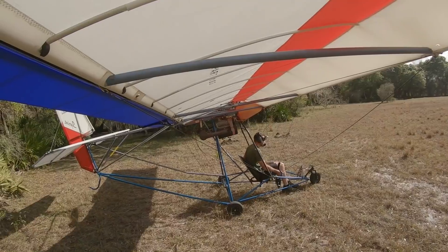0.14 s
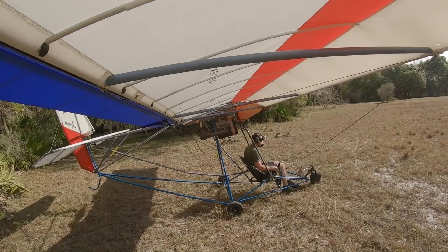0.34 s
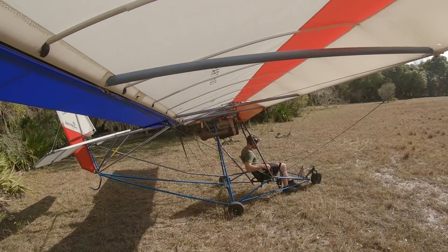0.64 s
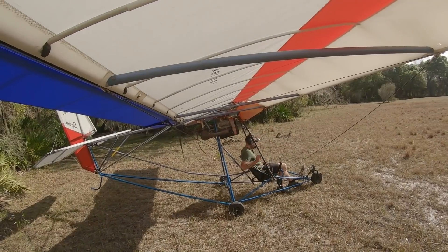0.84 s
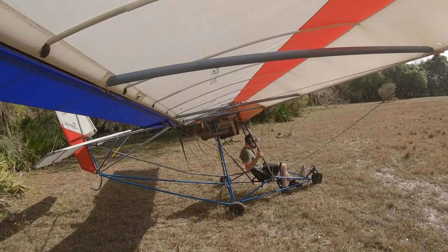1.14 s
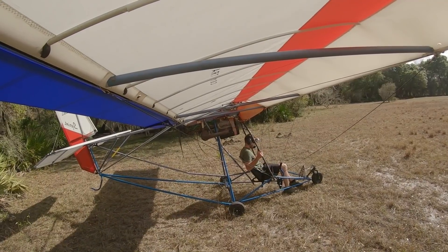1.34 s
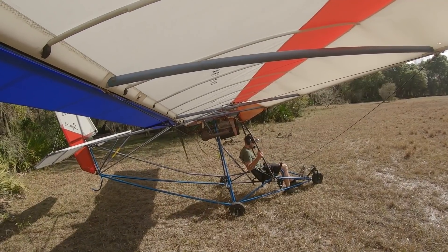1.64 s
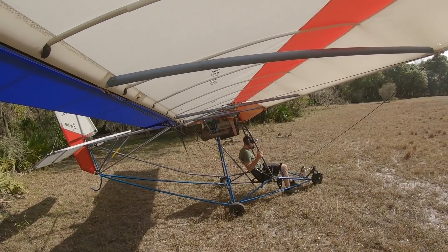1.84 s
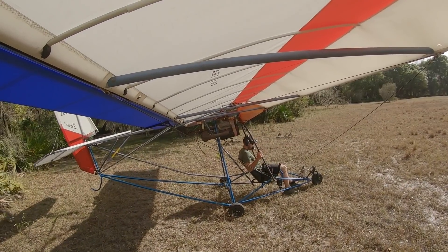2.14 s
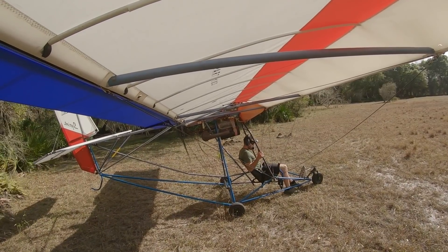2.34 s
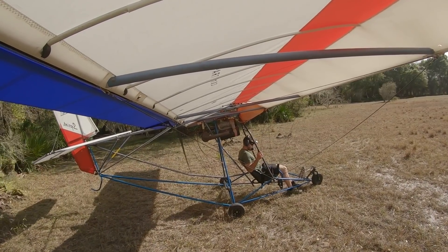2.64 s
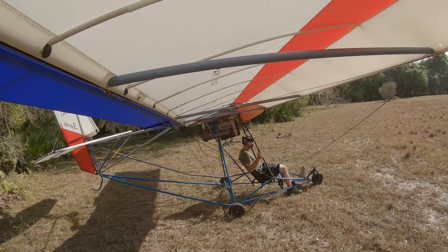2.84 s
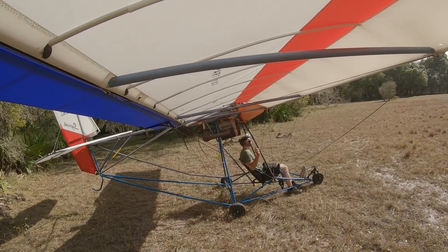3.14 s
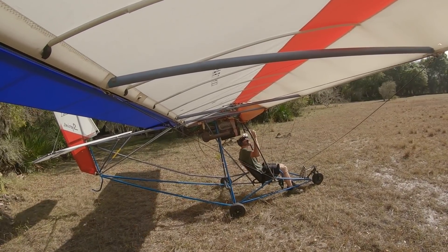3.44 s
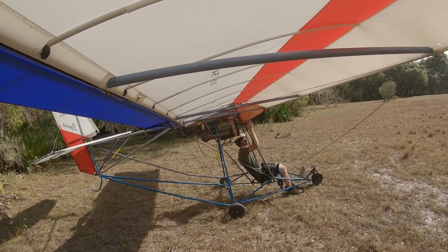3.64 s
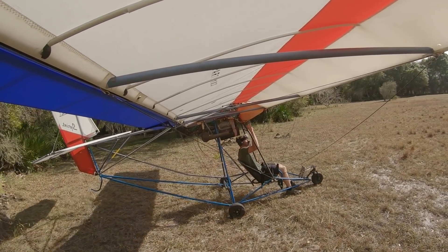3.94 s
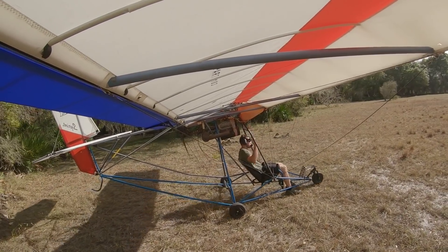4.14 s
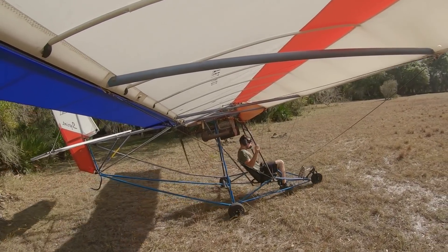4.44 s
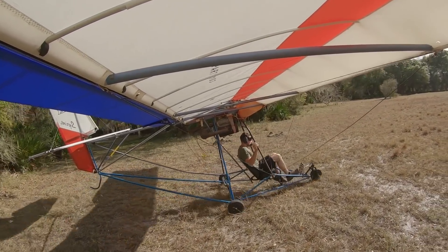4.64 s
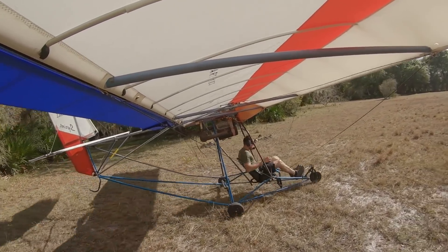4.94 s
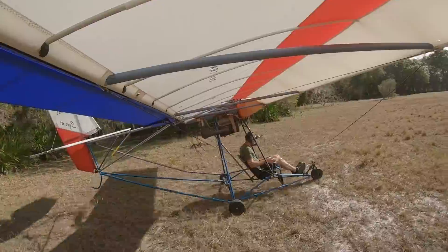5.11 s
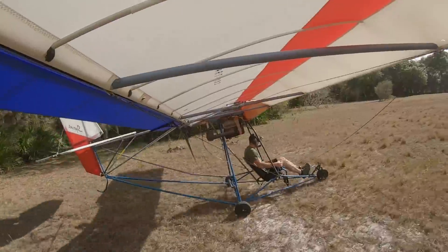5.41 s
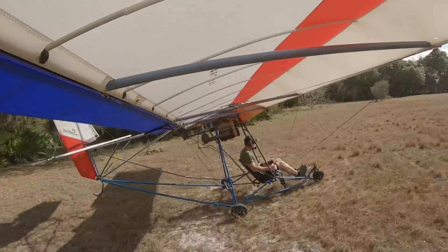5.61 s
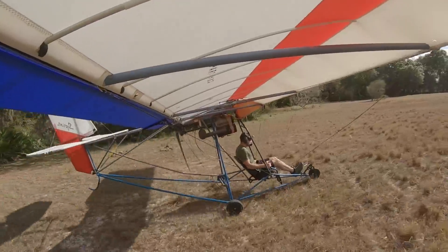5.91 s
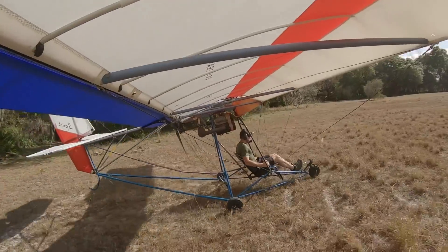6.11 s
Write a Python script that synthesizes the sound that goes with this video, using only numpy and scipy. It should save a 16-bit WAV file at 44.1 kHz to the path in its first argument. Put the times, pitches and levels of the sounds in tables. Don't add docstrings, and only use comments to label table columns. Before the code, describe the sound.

From 0 to 0.66 s there is only very quiet airy noise, thin hiss, a fine 60-per-second electrical buzz and faint low rumble. At about 0.67 s a small two-stroke idles in, uneven, with hollow pops and rattling clumps. From 1.5 s it runs up: exhaust rasp, propeller buzz and belt whine climb quickly, slowing near 2.7 s, with brief airframe resonances. At 2.8 s it jumps louder and holds part throttle, pitch creeping upward, whine prominent. Around 4.0-4.2 s it dips in level, then surges, pitch leaping about a quarter higher and loudest near 4.5 s. Hard uneven blade slaps, a mid-pitched strut hum until 5.5 s, and small overload ticks and thumps at 4.7-5.2 s accompany it as it eases into a steady full-power drone until 6.27 s. Close, dry, dull outdoor sound, nearly centred, slightly earlier on the right.

```python
import sys
import numpy as np
from scipy import signal
from scipy.fft import rfft, irfft, next_fast_len
from scipy.io import wavfile
from scipy.ndimage import uniform_filter1d, map_coordinates

SR = 44100
rng = np.random.default_rng(int(sys.argv[2]) if len(sys.argv) > 2 else 0)


def natural_amplitude(level_db):
    exponent = np.asarray(level_db, float) / 20
    return 10 ** exponent


def unload_wav(signal):
    wavfile.write(
        sys.argv[1],
        SR,
        np.round(np.clip(np.atleast_2d(signal).T, -1, 1) * 32767).astype(np.int16),
    )


N = 276507

# (time [s], crank turns [Hz], blade passes [Hz])
SHAFT_SPEEDS = [(1.4, 41.2, 30.75), (1.5, 43.01, 32.1), (1.6, 46.45, 34.71), (1.8, 55.32, 41.34),
                (2.0, 62.3, 46.42), (2.2, 67.75, 50.34), (2.45, 72.6, 53.95), (2.75, 76.0, 56.47),
                (3.1, 78.8, 58.55), (3.6, 80.7, 59.96), (4.15, 82.15, 60.98), (4.25, 84.4, 62.35),
                (4.5, 97.5, 71.6), (4.6, 101.67, 74.25), (4.7, 104.0, 75.52), (4.8, 105.73, 76.68),
                (5.1, 107.06, 77.66), (5.8, 107.93, 78.52)]
# (time [s], level [dB])
LOUDNESS = [(0, -48), (.662, -59.5), (.68, -45.5), (1.06, -41), (1.43, -42.5), (1.61, -30.5), (1.94, -25.5),
            (2.2, -23.5), (2.77, -21.5), (2.88, -15), (3.6, -15.5), (3.96, -16.5), (4.17, -20.5),
            (4.33, -13.5), (4.52, -7.5), (4.74, -11), (4.88, -13), (5.2, -14.5), (5.5, -16), (6.22, -16.5),
            (6.27, -16.5)]
# (time [s], stage [number])
THROTTLE_STAGE = [(0, 0.27), (.66, 0.54), (.672, 1.32), (1.45, 1.11), (1.6, 2.04), (2.1, 2.28), (2.6, 3.17),
                  (2.82, 3.02), (3.2, 3.015), (3.8, 3), (4.2, 3.24), (4.3, 3.68), (4.45, 4), (4.72, 4.6),
                  (4.87, 4.75), (5.35, 4.89), (5.52, 5.52), (6.27, 4.96)]
# (stage [number], level [dB])
TONE_SHARE = [(.5, -20), (1, -24), (1.5, -4), (2, -4.5), (3, 2.4), (4, -4.5), (5, 1.5)]
# (stage [number], level [dB])
RUSH_SHARE = [(2.4, -2), (3, -2), (3.5, -5), (3.999, -9.5), (4.501, -7.5), (4.798, -12.5), (5, -9)]
TONE_STAGES = [
    2.1,
    2.6,
    3,
    3.12,
    3.5,
    4,
    4.55,
    4.8,
    5,
]
# (crank multiple [number], level at each of the nine stages [dB])
EXHAUST_TONES = [(2, -5.5, -30.5, -36.5, -35, -20, -3.5, -8.0, -6.5, -4.5),
                 (3, -24, -50, -40, -41, -36, -31, -30, -50, -49),
                 (4, -9.5, -29, -21.5, -23, -30, -5.5, -14.5, -14, -15.0),
                 (5, -32, -25, -25.0, -24.5, -29.5, -26.5, -18.0, -16.5, -27),
                 (6, -30, -24.5, -23.5, -37.5, -32, -18, -7.5, -13, -13.5),
                 (7, -37, -31, -30, -39, -48, -38, -30.5, -20, -25.5),
                 (8, -17.5, -9, -17.5, -26, -26.5, -15, -11, -18, -20.5),
                 (9, -26, -18, -21.5, -32, -26.5, -29, -24, -40.5, -36),
                 (10, -13, -18, -19.5, -22.5, -14, -10, -17.5, -12.0, -11.5),
                 (11, -32, -24, -28.5, -21, -20, -17, -18.5, -30.5, -27.5),
                 (12, -17, -17, -21, -28, -19, -18, -25, -21.5, -27.0),
                 (13, -35, -26, -18, -36.5, -10.5, -15.5, -34.5, -39, -43.5),
                 (14, -21.5, -14.5, -18, -26.5, -22.0, -33.5, -34, -19, -20.5),
                 (15, -27, -24.5, -17, -29, -32.5, -34.5, -30, -43.5, -47),
                 (16, -20.5, -11.5, -16, -27.5, -18, -19, -30, -34.5, -26),
                 (17, -33, -27, -23, -33.5, -30, -21.5, -27, -26.5, -29.5),
                (18, -8, -11.5, -25.5, -32.5, -27.5, -19, -24.5, -35.5, -43),
                (19, -24, -35, -31.5, -29, -37.5, -31, -26, -29, -42.5),
                (20, -4.5, -13.5, -16.5, -7, -15, -32, -22.5, -24, -29),
                (21, -27, -25, -24.5, -31, -39, -31, -16.5, -25.5, -21.5),
                (22, -10.5, -14, -22.5, -23, -46.5, -25, -41, -39, -44),
                (23, -34, -28, -24.5, -28.5, -47.5, -30, -41, -36, -50.5),
                (24, -20, -14.5, -29, -30.5, -30.5, -29.5, -41.5, -41, -32.5),
                (25, -31.5, -26.5, -22, -17.5, -42, -48, -42.5, -38.5, -37),
                (26, -18, -17, -28.5, -24.5, -34, -41.5, -36.5, -24, -27),
                (27, -36, -28, -20, -8.5, -48, -33, -42.5, -39.5, -30),
                (28, -13, -19, -19.5, -45, -43, -36, -36.5, -31.5, -36),
                (29, -33.5, -31, -27.5, -30, -40.5, -39.5, -40.5, -44.5, -50.5),
                (30, -16, -21.0, -29, -30.5, -39, -35.5, -44, -44.5, -45.5),
                (31, -31, -28, -33.5, -33, -35.5, -45, -56.5, -54.5, -55),
                (32, -14, -10, -36.5, -35.5, -47.5, -33.5, -45.5, -50, -34),
                (33, -27, -19.5, -34, -24.5, -43, -42.5, -46, -60.5, -61),
                (34, -18, -28.0, -36.5, -35, -25, -37, -55.5, -60, -59)]
# (blade-pass multiple [number], level at each of the nine stages [dB])
BLADE_TONES = [(3, -48, -45, -38, -36, -18.5, -17, -16, -18.0, -17.5),
               (4, -31, -51, -40.5, -46.5, -32.5, -25, -23, -26, -32.5),
               (5, -23, -45, -33, -32, -37, -32.5, -25.5, -26.5, -27),
               (6, -49, -40, -24.5, -27.0, -27, -14.5, -19, -13, -12.5),
               (7, -44, -16.5, -22, -18.5, -28, -10, -15.5, -13.5, -14.5),
               (8, -14, -21.5, -27.5, -22, -21, -30, -20.5, -17.5, -19.5),
               (9, -23, -15.5, -31, -24.5, -25.5, -30, -10.5, -13.5, -12),
               (10, -36, -18, -32, -13, -18.5, -21.5, -13.5, -16.5, -22.5),
               (11, -21.5, -18.5, -21.5, -28, -22, -12, -28.5, -16, -22.5),
               (12, -36, -26, -24.5, -31, -26, -28, -16.5, -19.5, -30),
               (13, -35, -27.5, -25, -27.5, -33, -31, -33.5, -19, -34.5),
               (14, -19, -21, -25, -30, -33.5, -28.5, -33, -29, -30),
               (15, -25, -16, -25, -27.5, -22.5, -13, -18, -40.5, -29),
               (16, -35, -25.5, -22, -30, -31.5, -32.5, -33, -40.5, -33.5),
               (17, -38, -24.5, -27, -36, -27, -26, -33, -42, -44),
               (18, -34, -18, -20, -29, -37, -38.0, -31, -32, -46),
               (19, -33, -22, -23, -28, -24, -35, -33.5, -34, -26.5),
               (20, -35, -29, -34, -34.5, -40, -34.5, -32, -35.5, -38),
               (21, -31, -34, -19.5, -32.5, -43, -41, -47.5, -42, -40.5),
               (22, -27, -25, -34.5, -29.5, -40, -25.5, -24.5, -35.5, -21.5)]
UNEVEN_BLADES = [(4, 0), (4.5, .8), (4.7, .6), (4.82, .35), (5, .15)]
# (frequency [Hz], level against the whole [dB])
BELT_WHINE = [(800, -20), (1150, -15), (1300, -7), (1385, -2), (1456, -2), (1468, -9), (1830, -12.5),
              (1890, -29)]
# (frequency [Hz], width [Hz], boost [dB])
FRAME_RESONANCES = [(400, 48, 2), (540, 68, 1), (686, 40, 2), (930, 42, 5.5), (1100, 37, 4.5),
                    (1580, 90, 6), (1810, 70, 2.5)]
RESONANCE_SHARE = [(2.8, 1), (2.98, 0), (3.14, 0), (3.4, 1), (4.3, 1), (4.55, 0)]
THROTTLE_GULP = [(3.12, 0), (3.25, .45), (3.7, .45), (3.95, 0.01)]
# (frequency [Hz], width [Hz], level [dB])
MUFFLER = [(161, 20, 9.5), (536, 69, 0), (740, 59, -15), (1166, 55, 15), (1860, 24, 0), (2350, 330, -27)]
# (time [s], peak [dB], ringing [Hz])
IDLE_POPS = [(0.678, -54, 700), (0.775, -50, 660), (0.809, -49, 740), (0.917, -49, 770), (0.994, -43, 930),
             (1.009, -59, 880), (1.05, -46, 487), (1.098, -51, 540), (1.238, -52, 520), (1.309, -53, 494),
             (.679, -50, 1113), (.71, -50, 2060), (.735, -47, 1410), (.856, -55, 1190), (0.916, -46, 1050),
             (0.947, -44, 1280), (.988, -44, 1166), (1.012, -42, 1700), (1.046, -41.5, 1720),
             (1.073, -46, 1740), (1.005, -60, 170), (1.045, -52, 170), (1.106, -52, 169), (1.21, -59, 165),
             (1.25, -55, 165), (1.31, -56, 180), (1.39, -59, 170)]
# (frequency [Hz], level [dB per Hz])
AIR_COLOUR = [(60, -6), (130, 4), (200, 6), (300, 8), (450, 0.5), (700, 1), (1000, 2.5), (1400, -2),
              (1800, -18), (2200, -6), (2500, -12), (3000, -20), (3350, -21)]
# (frequency [Hz], level [dB per Hz])
IDLE_COLOUR = [(60, -24), (130, -15), (200, 0), (300, -4), (450, -8.5), (700, -6.5), (1000, -18),
               (1400, -0.5), (1800, -1), (2200, -7), (2500, -6.5), (3000, -6.5), (3350, -6.5)]
# (frequency [Hz], level [dB per Hz])
RUNUP_COLOUR = [(60, -30), (130, -22), (200, -18.5), (300, -18), (450, -8), (700, -9.5), (1000, 8.5),
                (1400, -3.5), (1800, -2), (2200, 0), (2500, -14.5), (3000, -21), (3350, -9.5)]
# (frequency [Hz], level [dB per Hz])
PART_COLOUR = [(60, -29), (130, -28), (200, -24), (300, -29), (450, -19), (700, -11.5), (1000, -14.5),
               (1400, -4), (1800, -6.5), (2200, -6), (2500, -8), (3000, -7), (3350, -18.5)]
# (frequency [Hz], level [dB per Hz])
SURGE_COLOUR = [(60, -36.5), (130, -43.5), (200, -21), (300, -32.5), (450, -16), (700, -11), (1000, -5),
                (1400, -8), (1800, -15), (2200, -5.5), (2500, -28), (3000, -9), (3350, -14.5)]
# (frequency [Hz], level [dB per Hz])
FULL_COLOUR = [(60, -20), (130, -29), (200, -14.5), (300, -31.5), (450, -8), (700, -24), (1000, -13),
               (1400, -18.5), (1800, -20), (2200, -18.5), (2500, -23.5), (3000, -21.5), (3350, -22.5)]
# (time [s], level [dB])
STRUT_LEVEL = [
    (4.5, -120),
    (4.58, -45),
    (4.68, -28),
    (5.16, -26),
    (5.3, -30),
    (5.44, -35),
    (5.52, -50),
    (5.6, -120),
]
# (frequency [Hz], likeness [0-1])
LIKENESS = [(100, 1), (500, 1), (2000, .95), (3300, .95)]
# (frequency [Hz], level [dB per Hz])
HISS_COLOUR = [(3000, -7), (4000, -2.5), (8000, -2), (12000, -2), (13000, -10), (15500, -16.5)]
# (frequency [Hz], level [dB per Hz])
BUZZ_COLOUR = [(3000, -27), (10000, -27), (12200, -24), (13100, -11), (13900, -28), (14500, -13),
               (14900, -1.5), (15400, -5)]
# (engine level [dB], low band [dB], middle band [dB])
FLOOR_DUCKING = [(-50, -70.5, -73), (-20.5, -69.5, -73), (-14, -76.5, -74.5), (-16, -81.5, -74.5)]
# (engine level [dB], extra level [dB])
LOWEST_BAND_HOLE = [(-42, 0), (-28, -30)]
# (time [s], length [s])
TREBLE_GAPS = [
    (2.936, 0.04),
    (3.041, .925),
    (4.574, 0.023),
    (4.768, .055),
    (4.833, 0.23),
    (5.097, .095),
    (5.22, .07),
]
# (time [s], tick [dB], thump [dB], splatter [dB])
OVERLOADS = [
    (4.7103, -52, -64, -92.5),
    (4.7876, -49.5, -50, -63.5),
    (4.9203, -51.5, -42.5, -89),
    (4.952, -54, -49, -68),
    (5.0187, -57.5, -50, -84),
    (5.1054, -59, -51, -67.5),
    (5.1498, -50.5, -51.5, -96.5),
    (5.173, -52.5, -50, -68),
]

FRAME_RATE_HZ, FIRST_FRAME_S = 59.94, .00388
CAMERA_TOP_HZ = 3420
STRUT_HZ = 453.4
HARD_SLAP_S = 4.8125
SPLATTER_S = 0.029


def unit(x):
    return x / np.sqrt(np.mean(x ** 2) + 1e-20)


def along(points, hz):
    f, v = np.transpose(points)
    return np.interp(np.log(hz + 1), np.log(f + 1), v)


def by_value(x, table):
    return np.interp(x, *np.transpose(table))


def curves(rows):
    s, *columns = np.transpose(rows)
    t = np.arange(N) / SR
    return [np.interp(t, s, column) for column in columns]


def knots(rate):
    places = np.arange(N // 32 + 2) * 32 * min(rate, 100) / SR
    return map_coordinates(rng.standard_normal(700), [places])


def fine(coarse):
    return np.interp(np.arange(N) / 32, np.arange(len(coarse)), coarse)


def wobble(rate):
    return fine(knots(rate))


def filtered(x, response):
    m = next_fast_len(N + 8192)
    return irfft(rfft(x, m) * response(np.fft.rfftfreq(m, 1 / SR)), m)[..., :N]


def highpass(hz, corner_hz, power):
    return hz ** power / (hz ** power + corner_hz ** power)


def resonance(hz, centre_hz, width_hz):
    return 1 / (1 + (2 * (hz - centre_hz) / width_hz) ** 2)


def noise(spectrum, patchy_db):
    z = signal.stft(rng.standard_normal(N), nperseg=1024)[2]
    patches = uniform_filter1d(rng.standard_normal(z.shape), size=6, axis=0)
    patches = uniform_filter1d(patches, size=4, axis=1)
    raw = signal.istft(z * natural_amplitude(patchy_db * unit(patches)), nperseg=1024)[1][:N]
    return unit(filtered(raw, lambda hz: natural_amplitude(along(spectrum, hz)) * (hz < 1.2 * spectrum[-1][0])))


def preamp_hiss():
    shared = noise(HISS_COLOUR, patchy_db=4.0)
    opposite = noise(HISS_COLOUR, patchy_db=1.0) * [[1], [-1]]
    return natural_amplitude(-5.0) * (shared + 0.62 * opposite)


def frame_buzz():
    at = np.arange(FIRST_FRAME_S, N / SR, 1 / FRAME_RATE_HZ)
    spikes = np.zeros(N)
    spikes[np.round(at * SR).astype(int)] = natural_amplitude(1.2 * rng.standard_normal(len(at)))
    smear = np.hanning(70) * (1 + .8 * rng.standard_normal(70))

    def colour(hz):
        return natural_amplitude(along(BUZZ_COLOUR, hz)) * (hz > 2500)

    sharp = unit(filtered(spikes, colour))
    smeared = unit(filtered(np.convolve(spikes, smear, "same"), colour))
    return unit(sharp + 0.55 * smeared) + natural_amplitude(-7.0) * noise(BUZZ_COLOUR, patchy_db=2.5)


def camera_floor():
    floor = preamp_hiss() + frame_buzz()
    edges_hz = (3300, 5000, 7000, 12800, 15400)
    bands = [unit(filtered(floor, lambda hz: (hz > lo) & (hz <= hi)))
             for lo, hi in zip(edges_hz, edges_hz[1:])]
    t = np.arange(N) / SR
    muted = sum((t > s) & (t < s + length) for s, length in TREBLE_GAPS)
    engine_db = curves(LOUDNESS)[0]
    table_db, *ducked = np.transpose(FLOOR_DUCKING)
    low_db, middle_db = (np.interp(engine_db, table_db, db) for db in ducked)
    low_db = low_db - 6.0 - 25.5 * muted
    lowest_db = low_db + by_value(engine_db, LOWEST_BAND_HOLE)
    top_db = -69.5 - 47 * muted
    levels_db = lowest_db, low_db, middle_db, top_db
    return sum(natural_amplitude(db + 2.0) * band for db, band in zip(levels_db, bands))


def overloads():
    t = np.arange(N) / SR
    ticks, thumps, splatter = np.zeros((3, N))
    for s, tick_db, thump_db, splatter_db in OVERLOADS:
        splatter += natural_amplitude(splatter_db) * np.exp(-(2 * (t - s) / SPLATTER_S) ** 2)
        ticks[round(s * SR)] = natural_amplitude(tick_db + 17)
        thumps[round(s * SR)] = natural_amplitude(thump_db + 46)

    def tick_colour(hz):
        tilt = 1.4 / (1 + (hz / 12500) ** 10) + .5 / (1 + (hz / 4800) ** 6)
        return (hz > 3600) * tilt * np.exp(-.5j * (hz / 4000) ** 2)

    ticks = np.convolve(ticks, np.hanning(90) * rng.standard_normal(90) / 5, "same")
    ticks = filtered(ticks, tick_colour)
    spray = filtered(rng.standard_normal(N), lambda hz: (hz > 3750) / (1 + (hz / 4700) ** 12))
    thumps = filtered(thumps, lambda hz: 1j * hz * 40 / (40 ** 2 - hz ** 2 + 1j * hz * 40))
    return ticks + splatter * unit(spray) + thumps


def rumble():
    colour = [(15, -5.0), (40, 0.5), (100, -1.0), (200, -14)]  # (frequency [Hz], level [dB per Hz])
    opposite = noise(colour, patchy_db=-1) * [[1], [-1]]
    return natural_amplitude(-60.0) * (noise(colour, patchy_db=-2.5) + .2 * opposite)


def camera():
    return camera_floor() + rumble() + overloads()


def strut_hum(blade):
    level_db = curves(STRUT_LEVEL)[0] + wobble(12)
    hum = 2 * np.pi * STRUT_HZ * np.arange(N) / SR
    sidebands = [(-1, -10), (0, 0), (1, -6), (2, -9), (3, -10)]  # (turn-rate step [number], level [dB])
    shaken = sum(natural_amplitude(db) * np.cos(hum + k * np.pi * blade) for k, db in sidebands)
    return np.sqrt(2) * natural_amplitude(level_db) * shaken


def idle_pops():
    out = np.zeros(N)
    t = np.arange(SR // 10) / SR
    for s, db, hz in IDLE_POPS:
        decay = natural_amplitude(db + 10.5 - 60 * t / 0.072)
        attack = 1 - np.exp(-t / 0.0027)
        out[round(s * SR):][:len(t)] += decay * attack * np.sin(2 * np.pi * hz * t)
    return out


def gas_and_air_rush(stage, gain):
    colours = (IDLE_COLOUR, RUNUP_COLOUR, PART_COLOUR, SURGE_COLOUR, FULL_COLOUR)
    layers = [noise(AIR_COLOUR, patchy_db=.7)]
    layers += [noise(colour, patchy_db=3.0) for colour in colours]
    idle = filtered(layers[1], lambda hz: 1 + sum(natural_amplitude(db) * resonance(hz, c, w) for c, w, db in MUFFLER))
    layers[1] = unit(unit(idle) * natural_amplitude(2.06 * (stage > .6) * wobble(55)))
    shares = [np.sqrt(np.clip(1 - abs(stage - k), 0, 1)) for k in range(len(layers))]
    rush = sum(share * layer for share, layer in zip(shares, layers))
    scattered = sum(share * np.roll(layer, SR) for share, layer in zip(shares, layers))
    gulp = np.clip(by_value(stage, THROTTLE_GULP), 0, 1)
    rush -= gulp * filtered(rush, lambda hz: highpass(hz, 1750, 12))
    return gain * rush, gain * scattered


def belt_whine(stage, loud_db, blade):
    teeth_hz = curves(SHAFT_SPEEDS)[0] * np.interp(stage, [2, 2.4], [18, 17.85])
    teeth = np.cumsum(teeth_hz) / SR
    strain = np.interp(stage, [2.6, 2.95, 3, 3.14, 3.5], [4, 2, 1, 1.6, 2.6])
    level_db = loud_db + along(BELT_WHINE, teeth_hz) + strain * wobble(45)
    level_db += np.interp(stage, [2.6, 2.9, 3, 3.06, 3.128, 3.14, 3.6, 3.88, 4.03, 4.3],
                          [-2, -3, 1.5, .5, 0, -4, -6, -3, -10, -3])
    whine = np.sqrt(2) * natural_amplitude(level_db) * np.cos(2 * np.pi * teeth + 0.72 * strain * wobble(30))
    return whine * (1 + 0.084 * strain * np.cos(2 * np.pi * blade))


def shaft_tones(table, turns, stage, start, flutter_db, slip):
    stage = np.pad(stage[::32], (0, 1), "edge")
    unsteady = np.interp(stage, [2, 3, 3.5, 4.4, 4.7, 5], [.9, .8, .5, .5, .9, .75])
    early = np.append(stage[130:], np.full(130, stage[-1]))
    out = np.zeros(N)
    for step, ((_, *db), phase) in enumerate(zip(table, start)):
        order = round(table[0][0]) + step
        shake = unsteady * np.sqrt(np.clip(order, np.where(stage < 2.95, 11, 0), 14) / 10)
        level_db = np.interp(early if order < 2.5 else stage, TONE_STAGES, db)
        level_db += flutter_db * shake * (.5 * knots(13) + 0.85 * knots(40))
        rocking_db = 1.9 * np.clip(order / 14, .3, 1.6) ** 2 * (order > 2.5)
        level_db += rocking_db * np.minimum(knots(5), .5)
        angle = 2 * np.pi * order * turns + phase + fine(slip * shake * knots(14))
        out += fine(natural_amplitude(level_db)) * np.cos(angle)
    return np.sqrt(2) * out


def exhaust(crank, blade, stage):
    table = EXHAUST_TONES
    start = rng.uniform(0, 2 * np.pi, len(table))
    pulses = shaft_tones(table, crank, stage, start, flutter_db=2.5, slip=.45)
    return pulses * (1 + 0.14 * np.cos(2 * np.pi * blade))


def propeller(blade, stage, uneven):
    start = 0.45 * rng.standard_normal(len(BLADE_TONES))
    return (1 + uneven) * shaft_tones(BLADE_TONES, blade, stage, start, flutter_db=3, slip=0.4)


def through_airframe(tones, stage):
    def ringing(hz):
        return natural_amplitude(sum(db * resonance(hz, c, w) for c, w, db in FRAME_RESONANCES) - 1.6)

    return tones + by_value(stage, RESONANCE_SHARE) * (filtered(tones, ringing) - tones)


def engine():
    crank, blade = (np.cumsum(hz) / SR for hz in curves(SHAFT_SPEEDS))
    blade = blade - blade[round(HARD_SLAP_S * SR)]
    stage, loud_db = curves(THROTTLE_STAGE)[0], curves(LOUDNESS)[0]
    loud_db = np.where(stage > 2, uniform_filter1d(loud_db, size=2000), loud_db)
    uneven = np.clip(by_value(stage, UNEVEN_BLADES), 0, 1) * np.cos(np.pi * blade)

    tones = exhaust(crank, blade, stage) + propeller(blade, stage, uneven)
    tones *= natural_amplitude(loud_db + by_value(stage, TONE_SHARE))
    tones = through_airframe(filtered(tones, lambda hz: highpass(hz, 160, 8)), stage)

    depth = np.clip(stage / 2, 0, 1)
    chop = 1 + 0.096 * depth * np.cos(4 * np.pi * crank)
    chop *= 1 + 0.038 * depth * np.cos(2 * np.pi * blade)
    chop *= 1 + 0.15 * uneven
    gain = chop * natural_amplitude(loud_db + by_value(stage, RUSH_SHARE) + 0.34 * depth * wobble(12))
    rush, scattered = gas_and_air_rush(stage, gain)
    return tones + belt_whine(stage, loud_db, blade) + idle_pops() + strut_hum(blade) + rush, scattered


def scene():
    direct, scattered = engine()
    direct /= (1 + abs(direct / .72) ** 5) ** (1 / 5)
    scattered = filtered(scattered, lambda hz: np.sqrt((1 - np.clip(along(LIKENESS, hz), 0, 1)) / 2))

    def port_response(hz):
        turn = .06 + 2 * np.pi * hz * 5.6 / SR
        delay = np.exp(-.5j * np.outer([1, -1], turn))
        return delay * highpass(hz, 75, 3) / np.sqrt(1 + (hz / CAMERA_TOP_HZ) ** 70)

    return filtered(direct + np.array([scattered, -scattered]), port_response) + camera()


def low_pass(x):
    return signal.sosfilt(signal.butter(12, 15350, fs=SR, output="sos"), x)


def record(dry):
    return low_pass(dry)


dry = scene()
out = record(dry)
unload_wav(out)
```